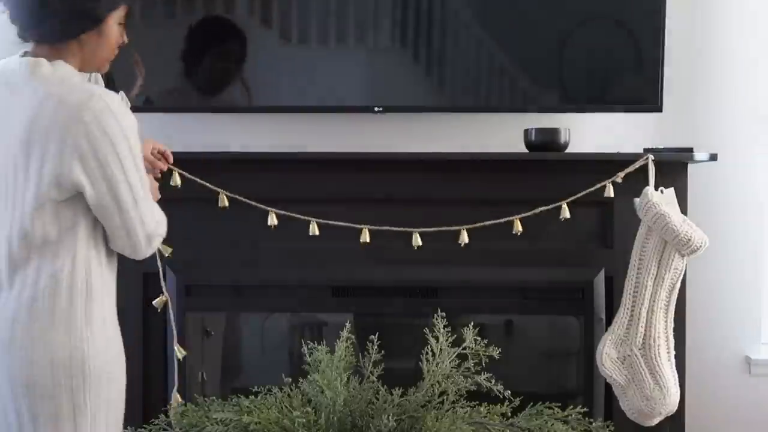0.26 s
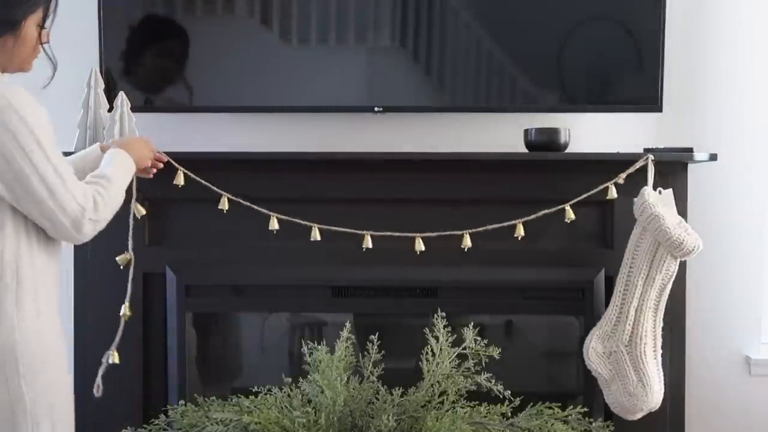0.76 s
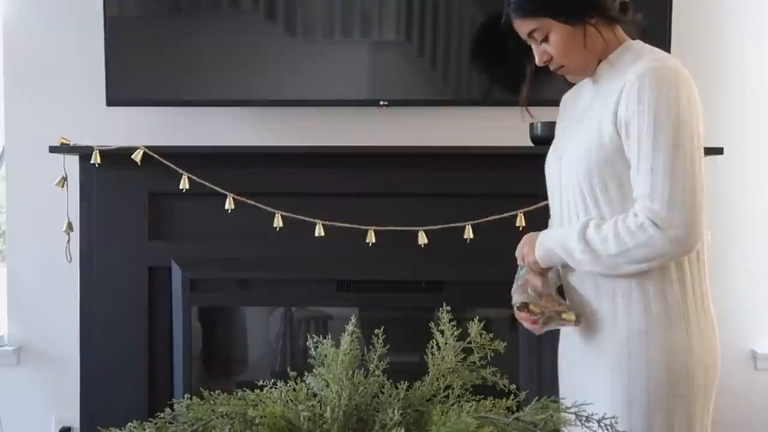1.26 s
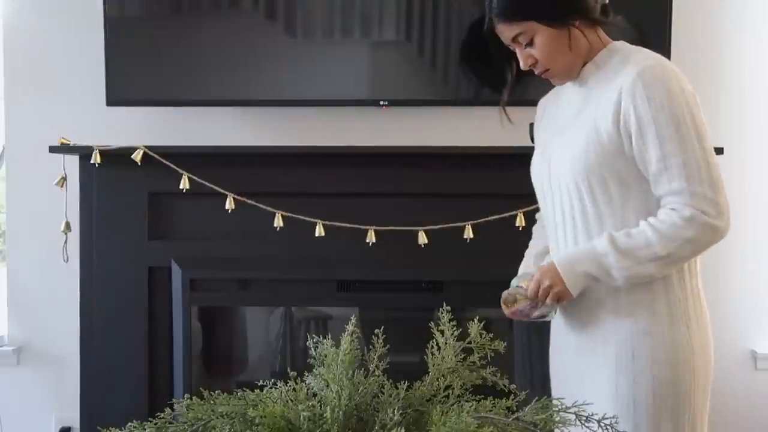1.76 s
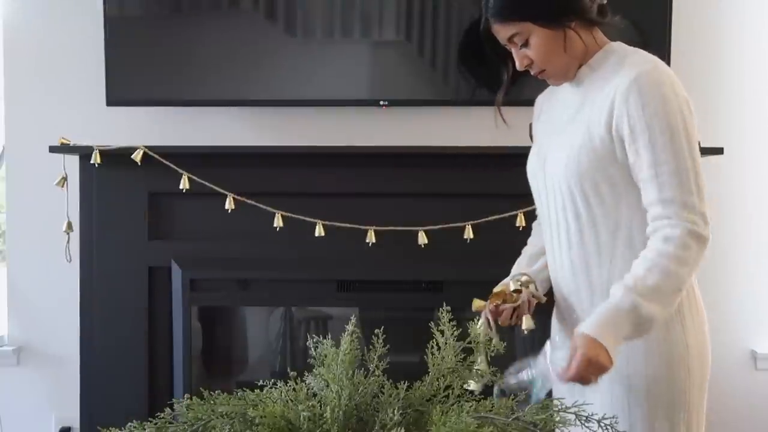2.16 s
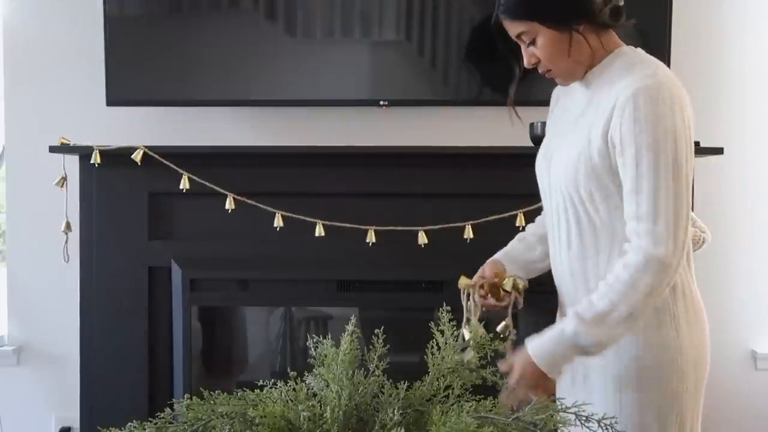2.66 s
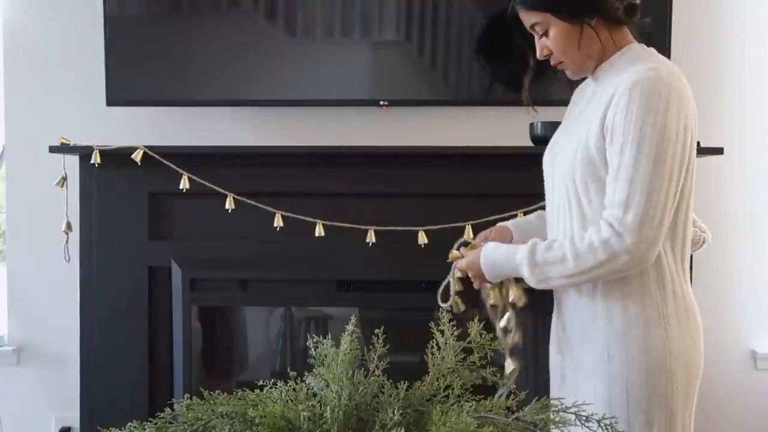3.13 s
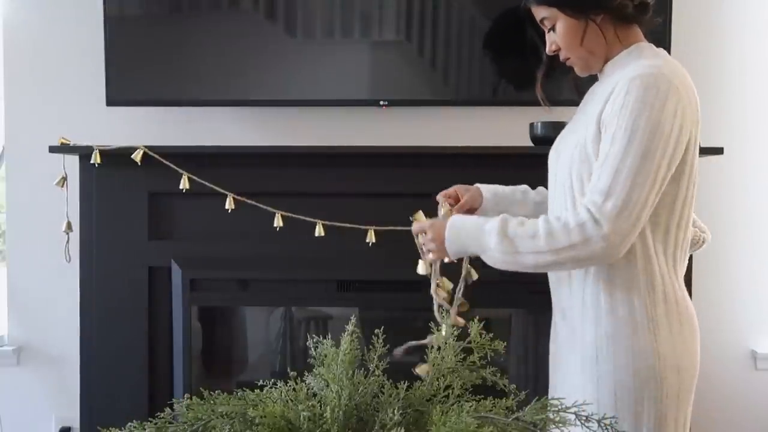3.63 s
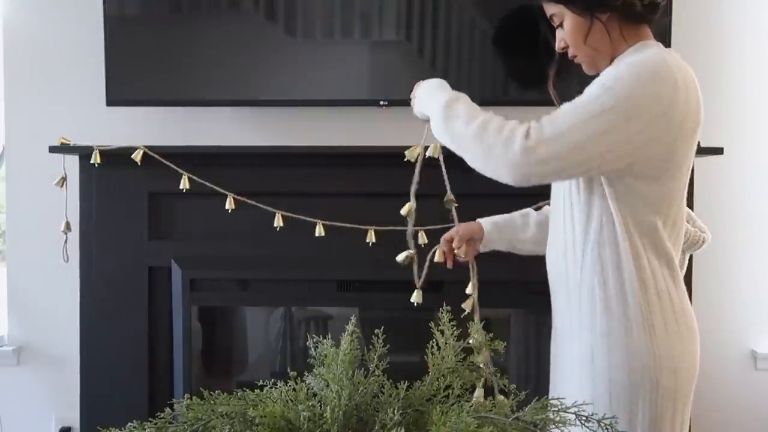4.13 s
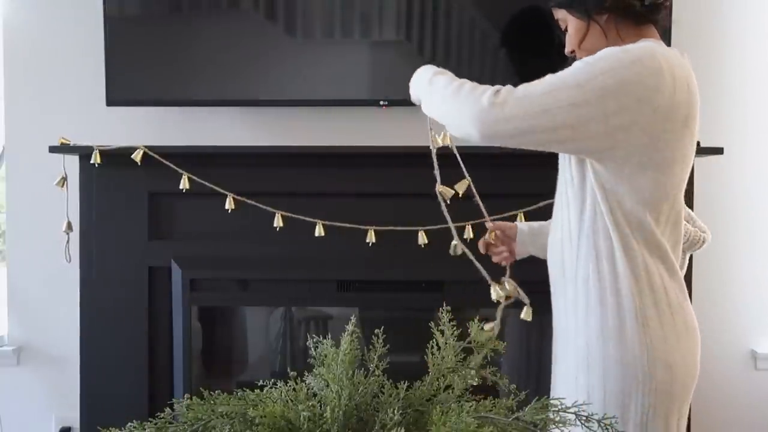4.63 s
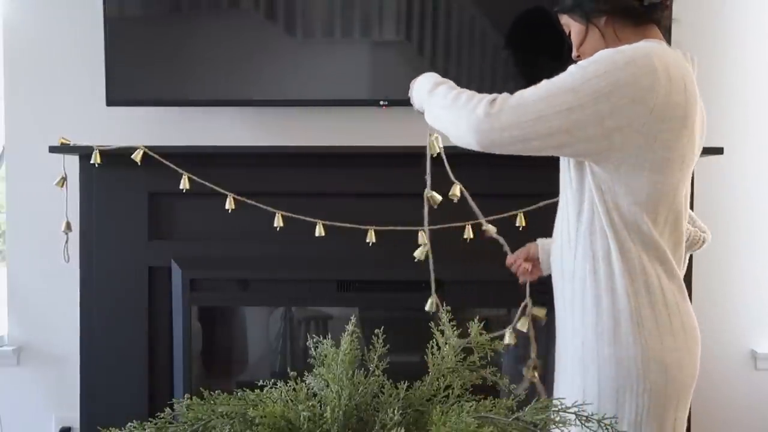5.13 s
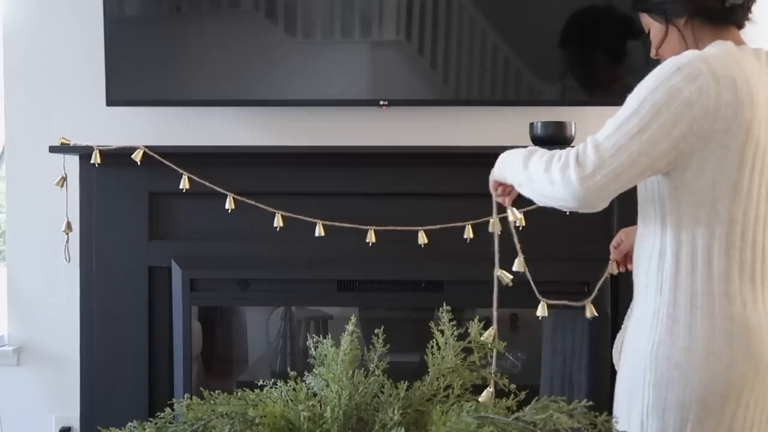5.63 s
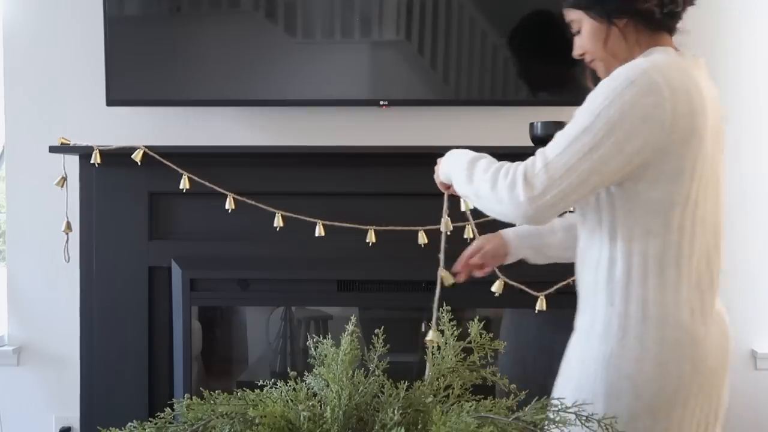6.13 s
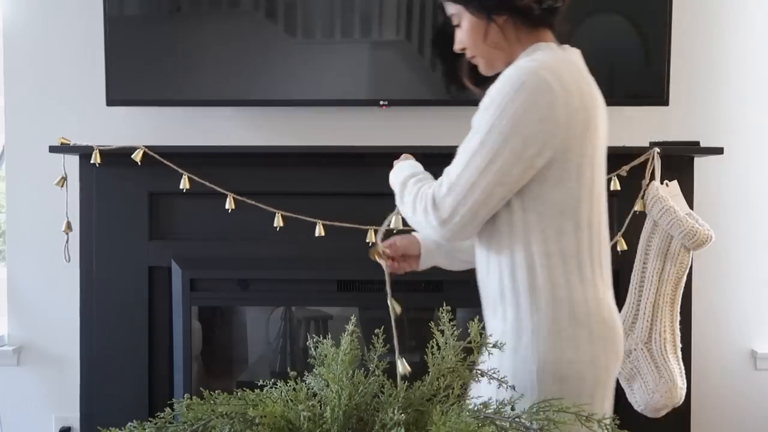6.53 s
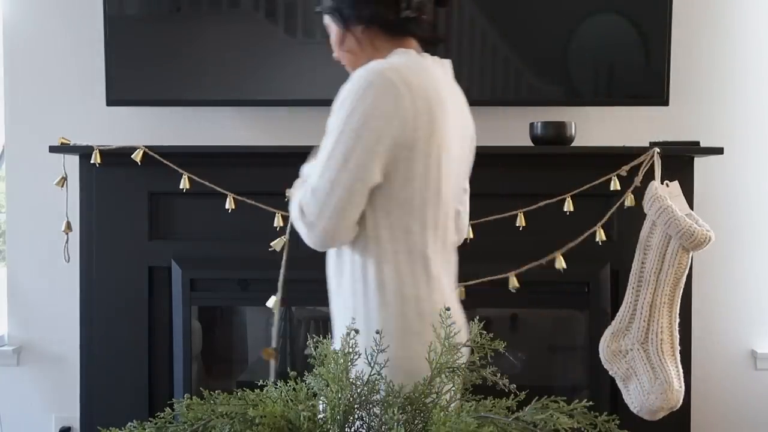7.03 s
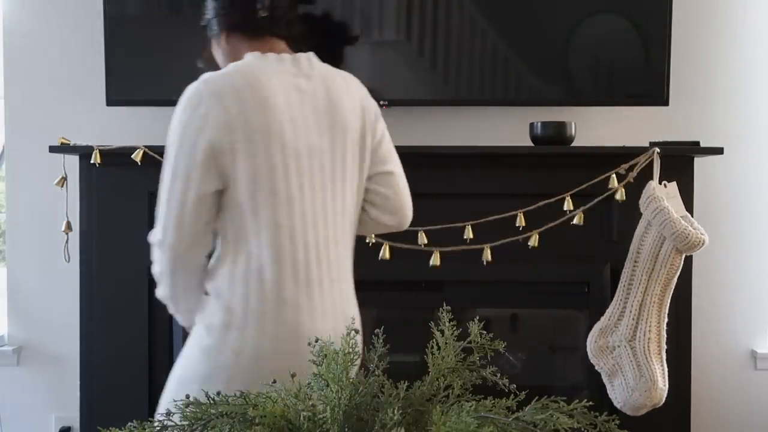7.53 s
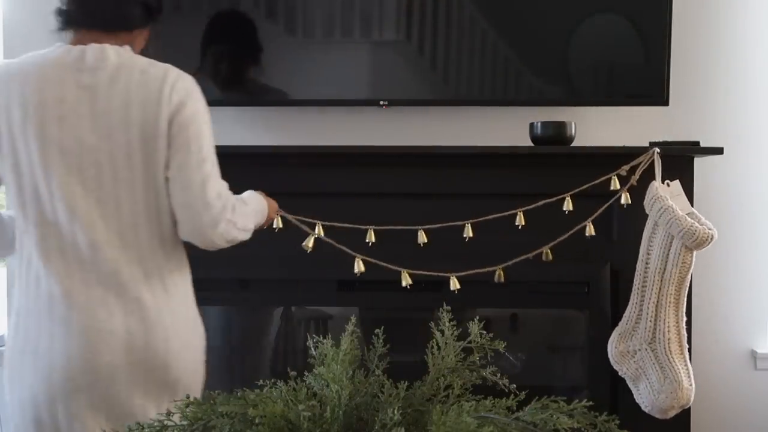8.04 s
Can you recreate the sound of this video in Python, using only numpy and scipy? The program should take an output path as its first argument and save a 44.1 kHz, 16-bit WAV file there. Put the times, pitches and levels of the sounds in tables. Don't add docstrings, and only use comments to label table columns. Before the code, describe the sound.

In a quiet living room with low hum and faint hiss, a string of small brass bells gives a few soft, high tinkles. At about 1.2 seconds the scene cuts abruptly to sharp plastic bag crackle, loudest near 2 seconds. A second bell string then jingles brightly, with clacks and light rattles, strongest from about 3.3 to 5.3 seconds, before thinning out. Phone microphone about two metres away, stereo, with short room reverberation.

```python
import sys
import numpy as np
from scipy import signal
from scipy.fft import rfft, irfft
from scipy.io import wavfile
from scipy.ndimage import uniform_filter1d

SR = 44100
rng = np.random.default_rng(int(sys.argv[2]) if len(sys.argv) > 2 else 0)


def gain_from_decibels(decibels):
    exponent = np.asarray(decibels, float) / 20
    return 10 ** exponent


def to_wav(sig):
    pcm = np.clip(np.atleast_2d(sig), -1, 1) * 32767
    pcm = np.round(pcm).astype(np.int16)
    wavfile.write(sys.argv[1], SR, pcm.T)


N = 365588
TIME = np.arange(N) / SR
CUT_S = 1.197
RING_T60_S = 0.56, 1, 0.52

# t/s, level/dB
MOTION = [(2.0, -54), (2.23, -36.5), (2.75, -69), (2.95, -40), (3.2, -41), (3.37, -25.5), (3.55, -46),
          (3.9, -49), (4.4, -39), (4.76, -43), (4.88, -38.5), (5.3, -37), (6.0, -46), (6.75, -66),
          (7.1, -44), (7.7, -56), (7.95, -51.5), (8.29, -53)]
# f/Hz, level/dB
MODE_BANDS = [(2200, -20), (2500, 0), (2700, 0), (3100, -20), (6500, -22), (6850, 0), (7350, 0), (7700, -36),
              (12400, -36), (12750, 0), (13600, 0), (14000, -45)]


def curve(rows, column=1):
    points = np.array(rows)
    return np.interp(TIME, points[:, 0], points[:, column])


def colour(x, spectrum, even=False):
    hz, db = np.transpose(spectrum)
    grid_hz = np.arange(2049) * SR / 4096 + 1
    gain = gain_from_decibels(np.interp(np.log(grid_hz), np.log(hz), db))
    cepstrum = irfft(np.log(gain))
    cepstrum[1:2048] *= 2
    response = irfft(np.exp(rfft(cepstrum[:2049], 4096)))
    if even:
        response = response / np.sqrt(np.sum(response ** 2))
    response = response.reshape((1,) * (x.ndim - 1) + (-1,))
    return signal.oaconvolve(x, response, axes=-1)[..., :x.shape[-1]]


def unit(x):
    return x / np.sqrt(np.mean(x ** 2))


def grains(per_second, spread_db):
    count = int(per_second * N / SR)
    when, rank, sign = rng.random((count, 3)).T
    size = gain_from_decibels(spread_db * np.minimum(-np.log(1 - rank), 3.5))
    out = np.zeros(N)
    out[(when * N).astype(int)] = size * np.sign(sign - 0.5)
    return unit(out)


def gusts(per_second, spread_db):
    hold = int(SR / per_second)
    level = np.repeat(rng.standard_normal(N // hold + 1), hold)
    return gain_from_decibels(spread_db * uniform_filter1d(level, hold // 2)[:N])


def blows(times, db, burst_s):
    out, t = np.zeros(N + 900), np.arange(900) / SR
    decay = np.exp(-t / 0.002) + 0.4 * np.exp(-t / burst_s)
    for s, gain in zip(times, gain_from_decibels(db)):
        start = int(s * SR)
        out[start:start + len(t)] += gain * rng.standard_normal(len(t)) * decay
    return out[:N]


def scattered(x):
    paths = rng.standard_normal(400) * np.exp(-np.arange(400) / SR / 0.002)
    paths = paths / np.sqrt(np.sum(paths ** 2))
    return np.array([x, np.convolve(x, paths)[:N]])


def home():
    # f/Hz, level/(dB per Hz)
    hum_spectra = [
        [(12, -47), (20, -24), (53, 1.5), (115, -9), (234, -5), (390, -14.5), (465, -17), (944, -29), (2200, -42), (2860, -68), (4840, -120)],
        [(12, -41), (20, -46), (55, 1.5), (146, -8), (185, -3.5), (360, -7), (382, -10), (689, -17), (2200, -25.5), (2860, -50), (4840, -120)],
    ]
    # f/Hz, level/(dB per Hz)
    hiss_spectrum = [(1500, -6.5), (3000, -8.5), (6300, -15), (8000, -13.5), (10500, -10.5), (11300, -23.5)]
    # f/Hz, side minus mid level/dB
    width = [(60, -37), (110, -12.5), (200, -10.5), (380, -2), (700, 0), (1290, 1), (2380, -0.5),
             (4400, -0.5), (8120, 3.5), (15000, 4)]
    noise, after = rng.standard_normal((2, 2, N)), TIME > CUT_S
    noise[:, 1] = colour(noise[:, 1], width)
    first_hum, second_hum = [colour(noise[0], spectrum, even=True) for spectrum in hum_spectra]
    hum = np.where(after, second_hum, first_hum)
    rumble = signal.sosfiltfilt(signal.butter(3, 115, fs=SR, output="sos"), hum)
    lull_s, fall_s, return_s, lull_db = 4.76, 0.21, 0.46, -22
    lull = gain_from_decibels(np.interp(TIME - lull_s, [0, fall_s, fall_s + return_s], [0, lull_db, 0]))
    hum = hum + (lull - 1) * rumble
    hiss = colour(noise[1], hiss_spectrum, even=True)
    return gain_from_decibels(np.where(after, -51.5, -49)) * hum + gain_from_decibels(np.where(after, -59, -57.5)) * hiss


def bag():
    # t/s, crackle level/dB
    handling = [
        (1.2, -42.5),
        (1.42, -39.5),
        (1.56, -51.5),
        (1.65, -40.5),
        (1.74, -43.5),
        (1.97, -36),
        (2.09, -35.5),
        (2.18, -59.5),
        (2.4, -47),
    ]
    # t/s, peak level/dB
    snaps = [(1.22, -24), (1.231, -10.5), (1.302, -12), (1.328, -14), (1.379, -11), (1.437, -14.5),
             (1.478, -36), (1.49, -15), (1.62, -20), (1.675, -16.5), (1.815, -12), (1.91, -11.5),
             (1.936, -15), (1.97, -7.5), (2.023, -7), (2.609, -21.5), (2.673, -22.5), (2.841, -24)]
    # f/Hz, level/(dB per Hz)
    film = [(300, -37), (500, -10), (1100, -1.5), (1800, 0.5), (2700, 4), (4000, -2.5), (6000, -13),
            (10000, -18.5), (11500, -51), (14500, -59)]
    s, peak_db = np.transpose(snaps)
    fade = np.clip((handling[-1][0] - TIME) / 0.09, 0, 1)
    effort = gain_from_decibels(curve(handling)) * (TIME > CUT_S) * fade
    buckles = unit(grains(500, 2.4) * gusts(45, 5))
    crackle = gain_from_decibels(2.0) * effort * buckles + blows(s, peak_db - 15.0, 0.02)
    crackle = colour(crackle, film, even=True)
    body = unit(colour(grains(600, 0.62), [(80, -46), (150, -1.0), (600, -6.5), (1200, -24.5)]))
    jostle = grains(200, 2.5)
    muffled = 0
    for hz, width_hz, db in [(2520, 64, -1.5), (7280, 81, -13), (13100, 72, -15.5)]:
        mode = signal.lfilter(*signal.iirpeak(hz, hz / width_hz, SR), jostle)
        muffled = muffled + gain_from_decibels(db) * unit(mode)
    return crackle + effort * (gain_from_decibels(-8.5) * body + colour(muffled, MODE_BANDS))


def clacks():
    # t/s, peak level/dB, thud level/dB
    first_knocks = [
        (0.063, -35, -60),
        (0.0885, -32, -61),
        (0.2927, -38, -65),
        (0.4858, -36, -65),
        (0.8016, -38, -65),
        (1.0435, -37, -46),
    ]
    # t/s, peak level/dB, thud level/dB
    second_knocks = [(2.2361, -17.5, -47), (2.2618, -26, -35), (2.6726, -24, -60), (3.1519, -16.5, -32),
                     (3.2643, -13, -54), (3.315, -12, -29), (3.342, -9.5, -46), (3.4945, -16.5, -29),
                     (3.7455, -13, -28), (3.9362, -15, -60), (4.203, -13, -50), (4.303, -17, -60),
                     (4.72, -30, -91), (4.8347, -8, -28), (4.878, -22, -55), (4.9833, -13, -53),
                     (5.037, -32, -43), (5.101, -16.5, -58), (5.1663, -15, -62), (5.4495, -17.5, -49),
                     (5.782, -25, -47), (5.993, -20, -53), (6.2514, -16, -38), (6.406, -25, -39),
                     (6.5748, -18, -47), (6.7418, -22.5, -59), (7.2565, -35, -57), (7.5155, -19.5, -34),
                     (7.6109, -16.5, -64), (7.8964, -16.5, -42)]
    # t/s, peak level/dB
    touches = [(2.9538, -26.5), (3.5524, -25), (3.8662, -26), (4.0084, -21), (4.1528, -27), (4.4504, -33),
               (4.5434, -27), (4.627, -30), (5.228, -41), (5.3025, -32), (5.3512, -33), (5.4176, -26),
               (5.5667, -39), (5.5992, -42), (5.6708, -39), (5.7118, -37), (5.878, -36), (5.907, -31),
               (6.098, -31), (6.119, -40), (6.2302, -31), (6.4883, -29), (6.5457, -31.5), (6.9352, -30.5),
               (7.0794, -30), (7.2968, -31.5), (7.3128, -38), (7.431, -50), (8.149, -36.5), (8.1848, -34)]
    # f/Hz, level/dB
    contact = [(1500, -6), (2600, 0), (4500, 0), (7000, -7), (12000, -14)]
    # f/Hz, level/(dB per Hz)
    shell = [(800, -27), (1800, -11.5), (2500, -6.5), (3300, 4), (4200, -6.5), (5000, -10), (6300, -15),
             (8500, -13.5), (10500, -14), (11400, -26), (15000, -89)]
    s, peak_db, thud_db = np.transpose(first_knocks + second_knocks)
    touch_s, touch_db = np.transpose(touches)
    ticks = unit(grains(190, 2.5) * gusts(35, 3.5))
    rattle = gain_from_decibels(curve(MOTION) - 5.5) * ticks * (TIME > MOTION[0][0])
    knocks = blows(s, peak_db - 10.0, 0.0032) + blows(touch_s, touch_db - 5, 0.0079)
    thud = blows(s, thud_db + 17, 0.0015)
    thud = colour(thud, [(500, -20), (1200, -24), (2000, -9.0), (3500, -22.5)])
    return colour(colour(knocks, contact) + rattle, shell, even=True) + thud


def shimmer(count=12):
    swing = np.zeros(N, complex)
    for low_hz in np.linspace(2562, 2646, count):
        taps = grains(11, 0.55)
        for ratio, db, t60 in zip((1, 2.725, 5.07), (7, 2, -1), RING_T60_S):
            hz = ratio * low_hz * (1 + 0.002 * rng.standard_normal())
            pole = np.exp((2j * np.pi * hz - np.log(1000) / t60) / SR)
            gain = gain_from_decibels(db) * np.sqrt(2 * (1 - abs(pole) ** 2) / count)
            swing += signal.lfilter([gain], [1, -pole], taps)
    first = TIME < CUT_S
    settling_db = -59.5 - 7 * TIME
    moved_db = -17 + 0.66 * curve(MOTION)
    level = gain_from_decibels(np.where(first, settling_db, moved_db)) * (first | (TIME > 2))
    return colour(np.array([swing.imag, swing.real]) * level, MODE_BANDS)


def bells():
    # t/s, low mode f/Hz above 2500, low mode level/dB, top mode level/dB (some blows sound
    first_string = [
        (0.0, 172.4, -42.5, -34),
        (0.1, 141.4, -44, -30.5),
        (0.2, 61.3, -43.5, -35),
        (0.294, 115.2, -56, -27.5),
        (0.485, 61.2, -45.5, -34),
        (0.657, 92.3, -52, -39.5),
        (0.75, 74, -52, -38),
        (0.801, 96.5, -40.5, -41.5),
        (1.044, 67.7, -42.5, -35.5),
        (1.119, 61, -42, -38),
    ]
    # t/s, low mode f/Hz above 2500, low mode
    # level/dB, top mode level/dB
    second_string = [(2.092, 109.3, -25.5, -24), (2.19, 118, -34, -22.5), (2.251, 93.8, -24, -33),
                     (2.308, 139.9, -26, -34), (2.421, 133.6, -28, -28), (2.492, 91.7, -37, -43),
                     (2.569, 144.8, -31.5, -37), (2.672, 140.8, -26, -32.5), (2.995, 140.8, -35.5, -34.5),
                     (3.143, 126.9, -21, -28.5), (3.18, 133.7, -32, -26), (3.331, 141.2, -18, -22),
                     (3.402, 110.7, -12, -29), (3.453, 117.8, -49, -19.5), (3.524, 74.3, -22, -24.5),
                     (3.618, 137.2, -53, -27.5), (3.685, 143.3, -20.5, -26.5), (3.781, 128, -30, -27),
                     (3.82, 103.2, -21.5, -46), (3.887, 103.2, -20, -28.5), (3.956, 132.4, -31, -21.5),
                     (4.037, 69.14, -18, -22.5), (4.223, 86.2, -24, -25.5), (4.32, 61.2, -37, -35),
                     (4.391, 93.6, -22.5, -35), (4.5, 130, -46, -30), (4.542, 114.7, -24.5, -37),
                     (4.629, 113.2, -20, -39), (4.671, 127, -23.5, -35),
                     (4.833, 103.1, -13, -28), (4.934, 111.1, -22.5, -23.5), (4.983, 128.6, -39, -23),
                (5.061, 137.5, -34, -25.5), (5.143, 126.3, -19.5, -25.5), (5.177, 95, -17.5, -24),
                (5.24, 113.4, -24, -25.5), (5.299, 117.6, -29, -23), (5.372, 124.1, -25, -26),
                (5.453, 109.6, -19.5, -25), (5.561, 118.2, -23, -25), (5.679, 140.1, -20.5, -32.5),
                (5.782, 113.1, -28, -25), (5.929, 110.2, -29.5, -26), (6.031, 99.2, -23, -28),
                (6.223, 121.9, -22, -30), (6.254, 106, -27, -26), (6.342, 75.4, -20, -29),
                (6.488, 79.8, -28.5, -28), (6.601, 82.7, -28, -32.5), (6.741, 62.5, -31, -34.5),
                (7.43, 115, -28, -37), (7.004, 136.3, -31, -38), (7.053, 125.8, -33.5, -31.5),
                (7.256, 90, -25, -31), (7.612, 96.9, -27, -37.5), (7.896, 93.5, -23.5, -32.5),
                (7.912, 123.3, -41, -27), (8.06, 79, -47, -40), (8.15, 111, -31, -30)]
    split_hz = 30.9, 33.4, 36.8
    out, t = np.zeros((2, N + SR)), np.arange(int(0.4 * SR)) / SR
    envelope = np.minimum(t / 0.0024, 1) * (1 - t / t[-1])
    for s, offset_hz, low_db, top_db in first_string + second_string:
        low_hz = 2500 + offset_hz
        top_hz = 5.056 * low_hz + 48.9 * (rng.random() - 0.5)
        mode_hz = low_hz, 0.5385 * top_hz, top_hz
        mode_db = low_db, -3 + low_db + 0.74 * (top_db - low_db), top_db
        ring = 0
        for hz, db, t60, split in zip(mode_hz, mode_db, RING_T60_S, split_hz):
            mid_phase, depth, spread, beat_phase, side_phase = rng.random(5)
            beat_hz = split * (0.668 + spread)
            beat = 1 + (0.79 + 0.28 * depth) * np.cos(2 * np.pi * (beat_hz * t + beat_phase))
            swing = np.exp((2j * np.pi * hz - np.log(1000) / t60) * t) * gain_from_decibels(db) * beat
            ring = ring + (swing * np.exp(2j * np.pi * np.array([[mid_phase], [side_phase]]))).imag
        start = int(s * SR)
        out[:, start:start + len(t)] += ring * envelope
    return out[:, :N]


def room(direct):
    # f/Hz, side minus mid level/dB
    width = [(60, -8), (110, -15), (200, -20), (380, -13), (700, -16), (1290, -25), (2380, -19), (4400, -7),
             (8120, 0.5), (15000, 2.5)]
    t60_s, tail_db = 0.64, -2
    t = np.arange(SR // 2) / SR
    tail = colour(rng.standard_normal((2, len(t))), [(3000, 0), (14000, -4)]) * gain_from_decibels(-60 * t / t60_s)
    tail = gain_from_decibels(tail_db) * tail * np.minimum(t / 0.0015, 1) / np.sqrt(np.sum(tail[0] ** 2))
    tail[:, 0] += 1
    before, wet = TIME < CUT_S, 0
    for gate in (before, ~before):
        wet = wet + signal.fftconvolve(direct * gate, tail, axes=1)[:, :N] * gate
    mid, side = wet
    return np.array([mid, colour(side, width)])


def scene():
    handled = scattered(clacks() + bag())
    ringing = gain_from_decibels(-5.5) * bells() + shimmer()
    mid, side = room(ringing + handled) + home()
    return np.array([mid + side, mid - side])


def roll_off(x):
    return signal.sosfilt(signal.butter(12, 15700, fs=SR, output="sos"), x)


def record(dry):
    dull = signal.sosfilt(signal.ellip(8, 0.2, 70, 15200, fs=SR, output="sos"), dry)
    return roll_off(dull)


dry = scene()
out = record(dry)
to_wav(out)
```